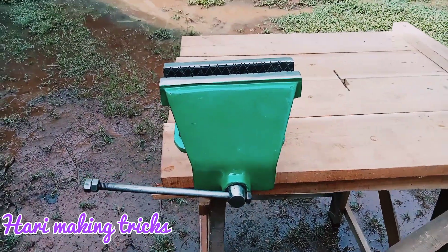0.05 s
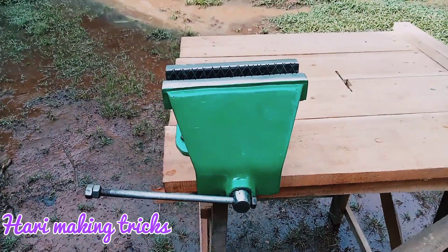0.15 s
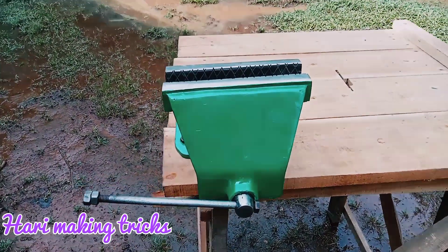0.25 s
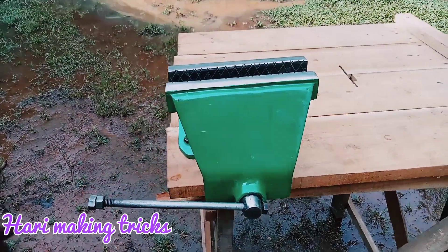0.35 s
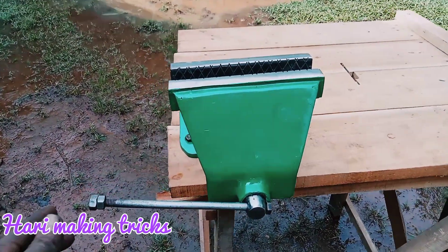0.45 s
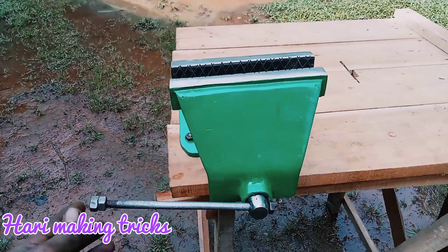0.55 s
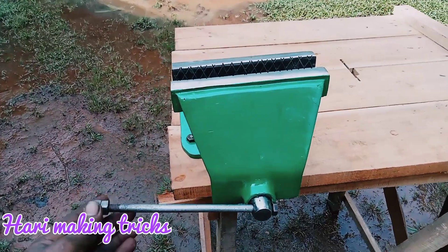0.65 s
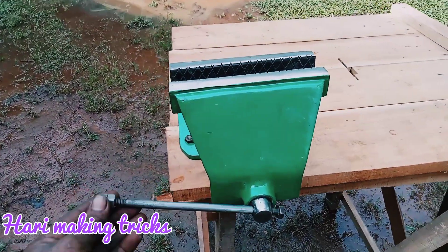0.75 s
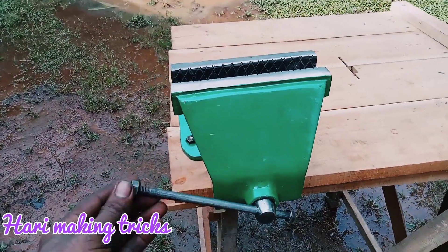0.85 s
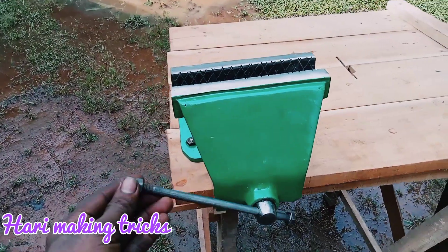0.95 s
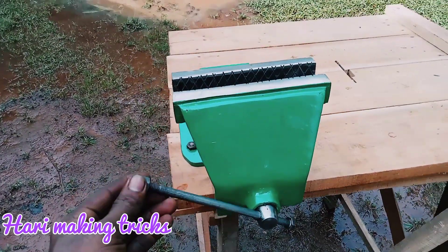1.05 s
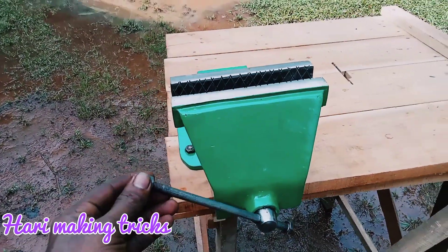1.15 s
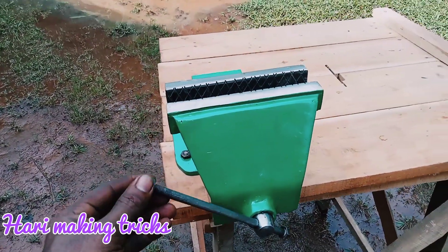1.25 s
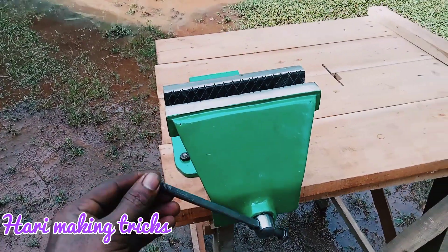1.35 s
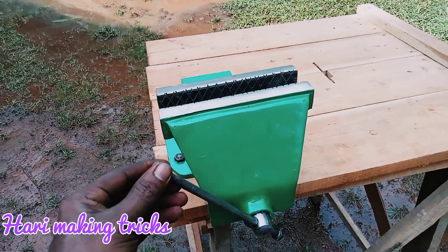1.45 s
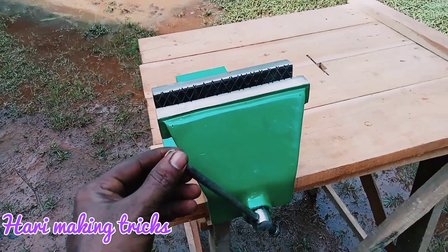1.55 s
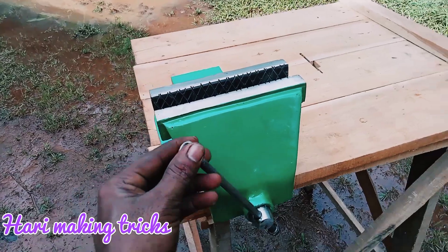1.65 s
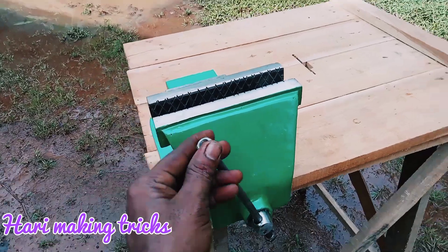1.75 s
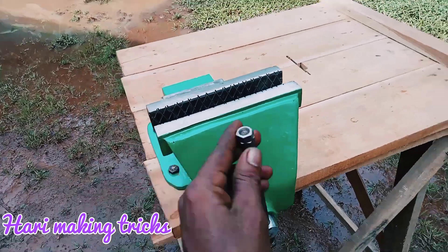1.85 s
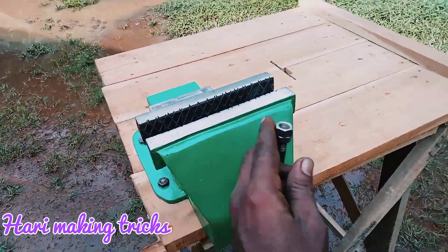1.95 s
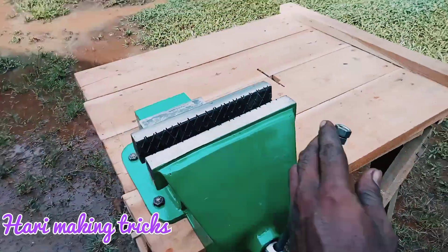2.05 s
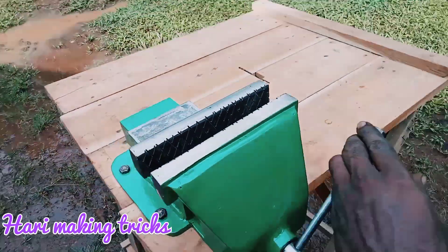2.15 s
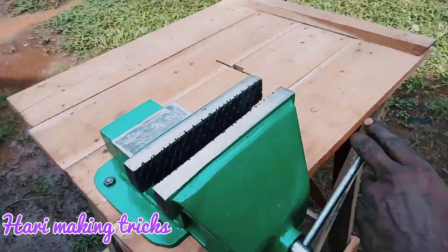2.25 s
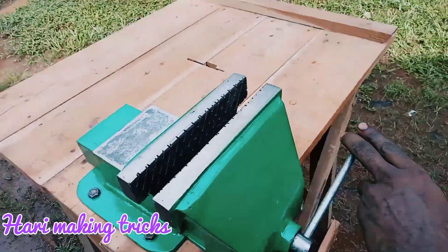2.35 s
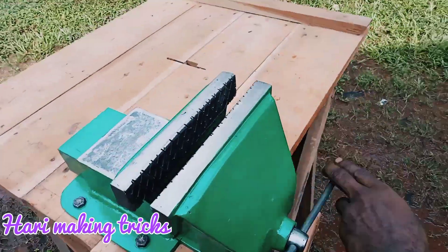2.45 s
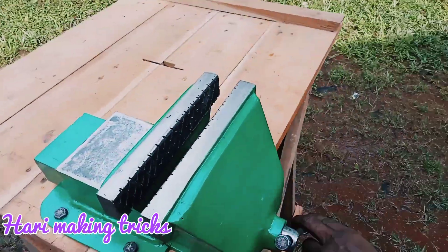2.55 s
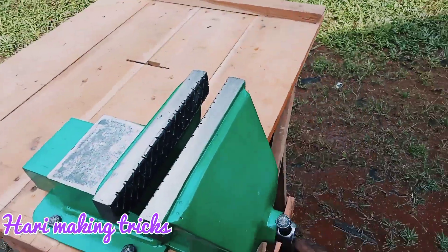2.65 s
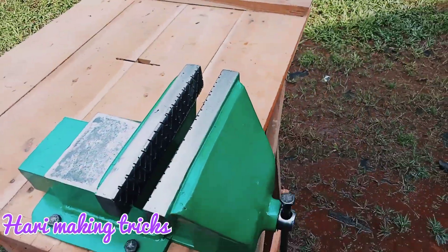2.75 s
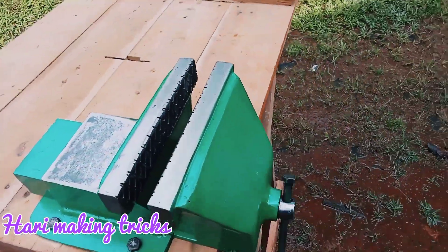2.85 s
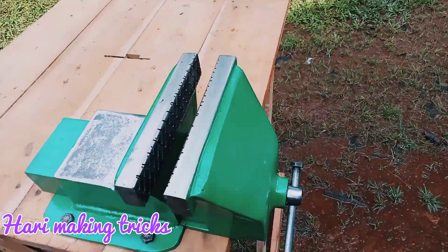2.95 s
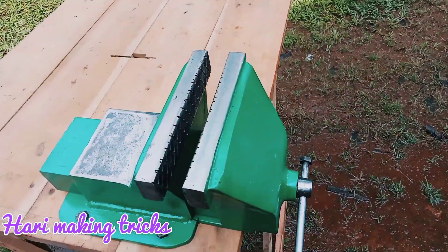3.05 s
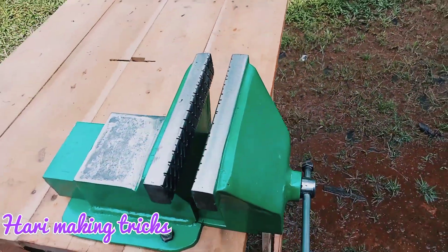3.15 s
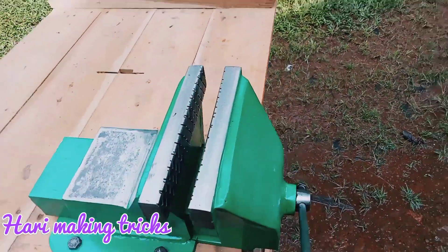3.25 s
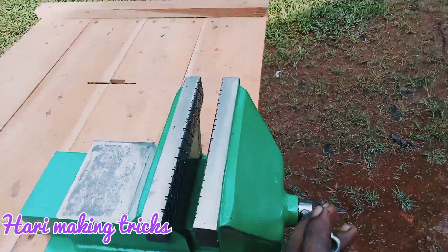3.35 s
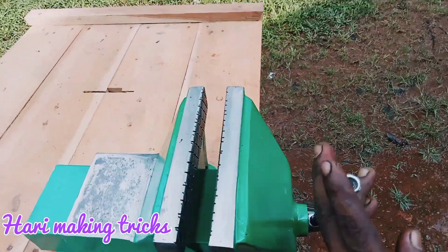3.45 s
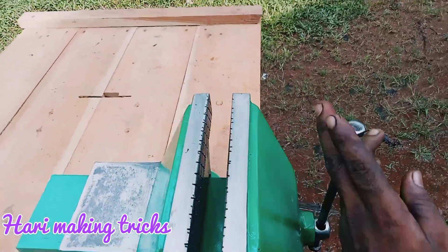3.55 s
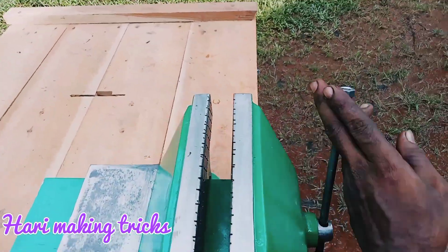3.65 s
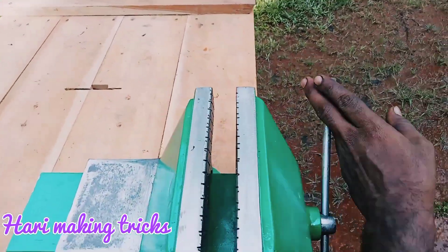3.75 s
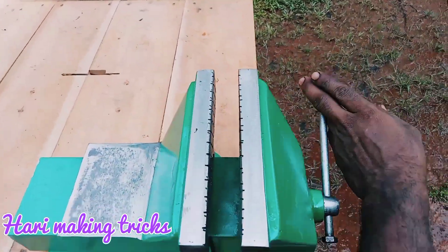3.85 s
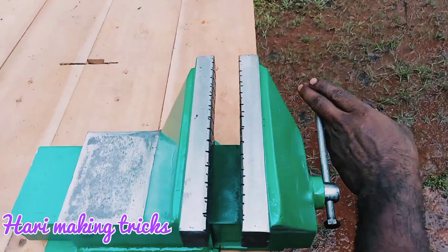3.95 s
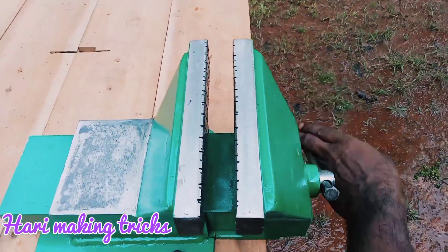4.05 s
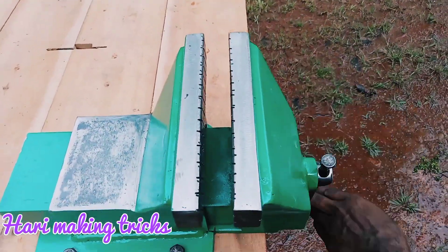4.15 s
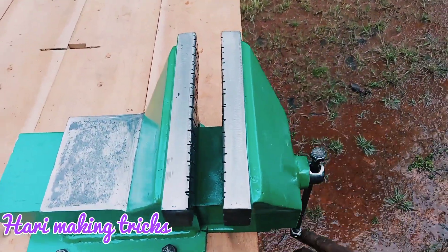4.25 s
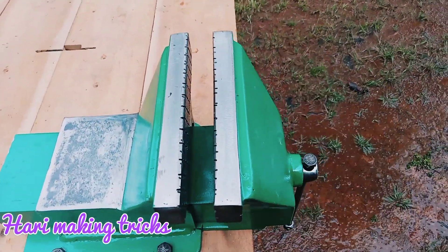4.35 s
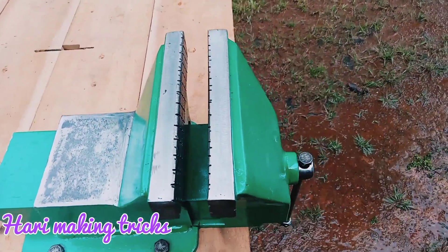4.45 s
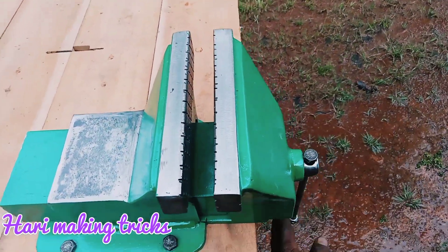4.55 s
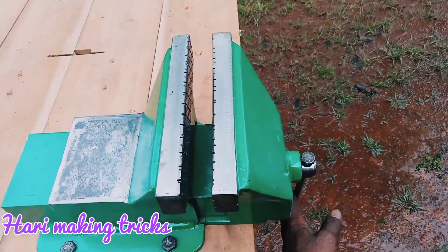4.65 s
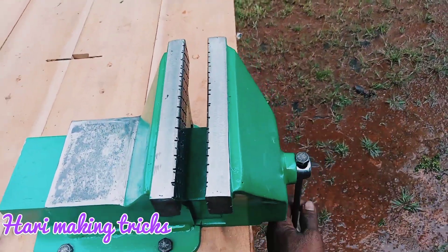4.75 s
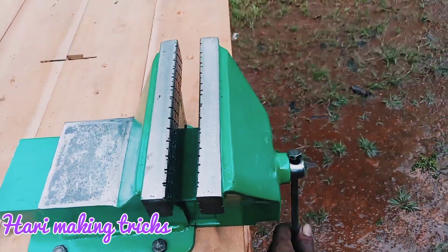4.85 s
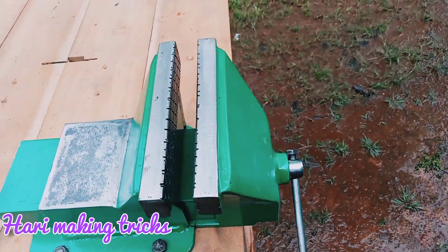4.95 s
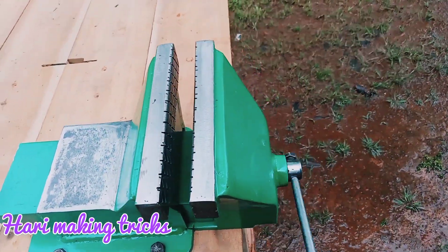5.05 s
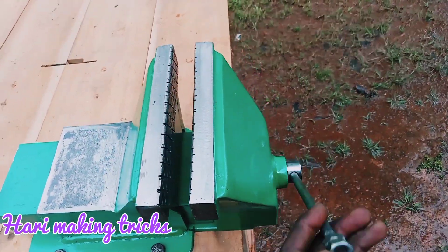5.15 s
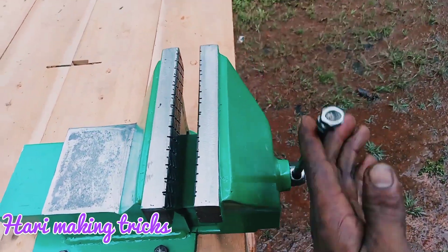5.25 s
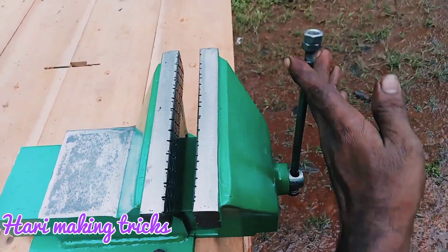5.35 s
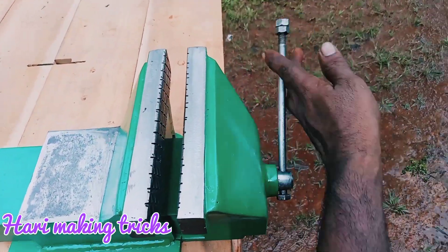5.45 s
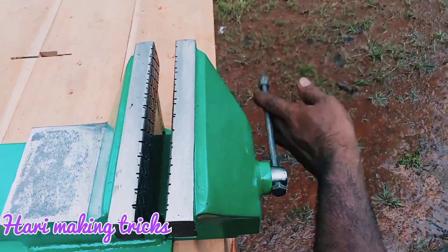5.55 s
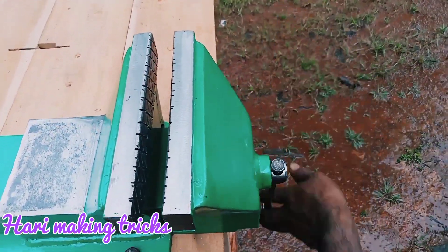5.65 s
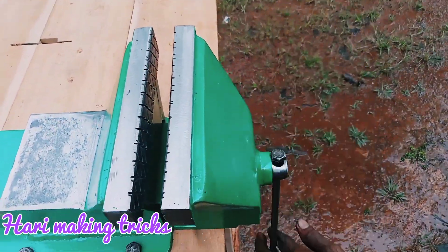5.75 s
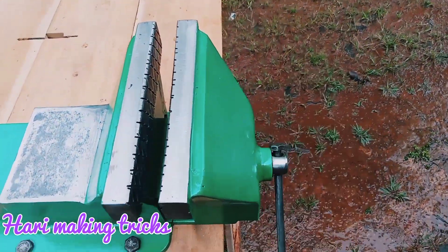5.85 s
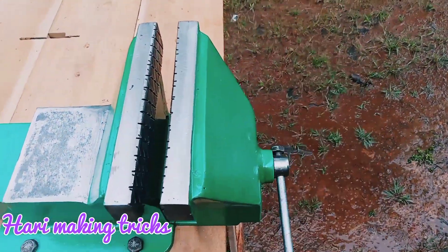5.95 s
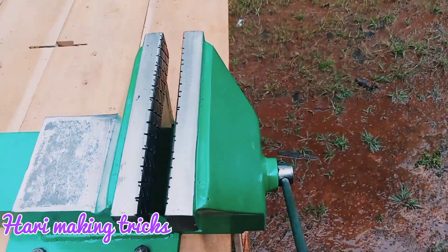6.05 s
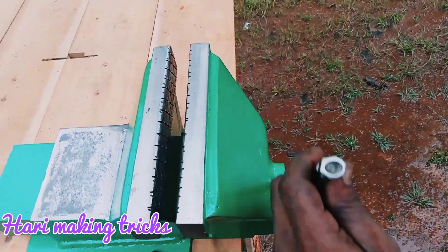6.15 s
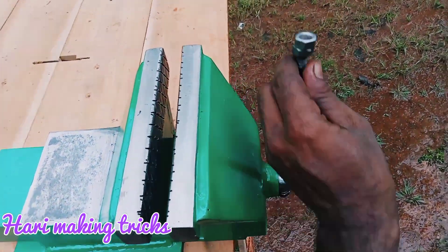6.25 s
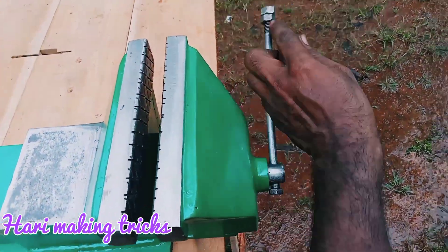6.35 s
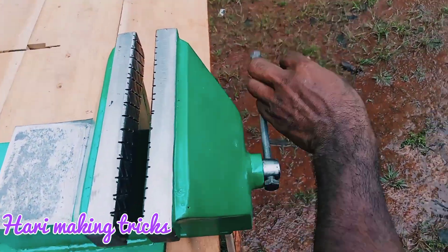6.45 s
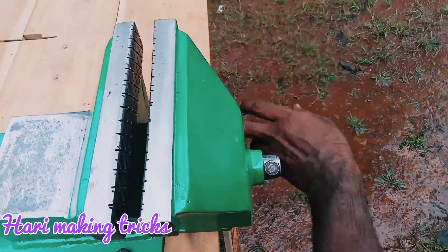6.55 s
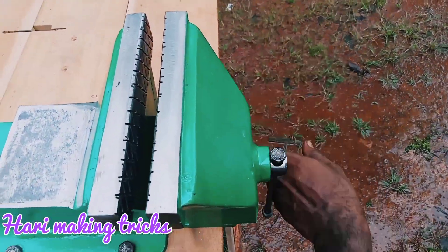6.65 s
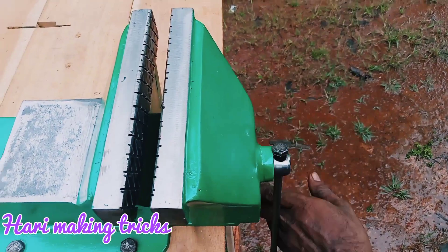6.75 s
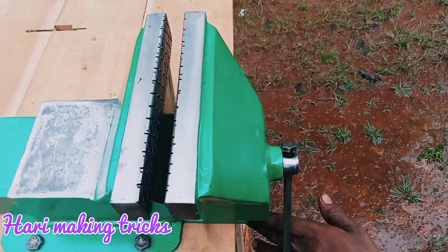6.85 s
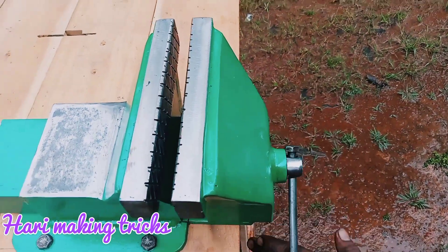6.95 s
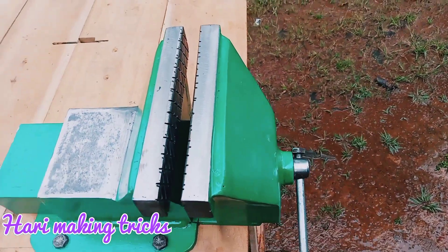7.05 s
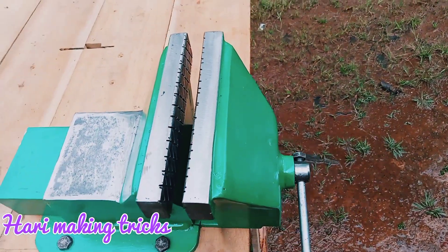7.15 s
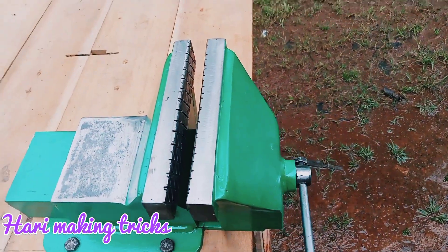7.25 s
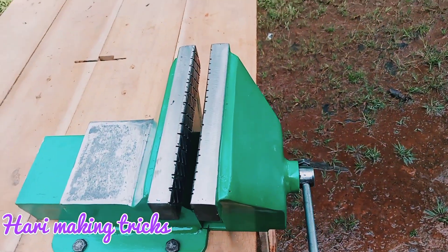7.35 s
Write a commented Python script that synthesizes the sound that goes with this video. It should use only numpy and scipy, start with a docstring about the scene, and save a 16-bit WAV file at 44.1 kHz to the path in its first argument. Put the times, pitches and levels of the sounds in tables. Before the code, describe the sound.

A steel bench vise is cranked by hand outdoors. Its loose handle bar gives light, scattered ticks and knocks at first, then the dry screw begins to rasp in uneven spurts. Just past the middle the bar drops with one sharp metallic clack, followed by busier knocks, short scrapes and soft thuds through the wooden table. Faint bird chirps, insects and a soft hiss sit behind the nearby vise.

```python
"""The sliding bar of a steel bench vise, spun by hand, ticks in its hole and once clacks onto its end nut.
The dry screw grinds by stick-slip friction and knocks in its slack. Each contact is a brief chatter
of impacts that excites the damped modes of bar, jaws and the wooden table the vise is bolted to.
Behind it, outdoors, birds chirp in gliding tones and insects trill and drone over a soft hiss."""
import sys
import numpy as np
from scipy import signal
from scipy.fft import rfft, irfft
from scipy.io import wavfile
from scipy.ndimage import uniform_filter1d

SR = 44100
rng = np.random.default_rng(int(sys.argv[2]) if len(sys.argv) > 2 else 0)


def int16_out(signal):
    """Quantize to a 16-bit WAV file."""
    q = np.round(np.clip(np.atleast_2d(signal).T, -1, 1) * 32767)
    wavfile.write(sys.argv[1], SR, q.astype(np.int16))


N = 325899
TIME = np.arange(N) / SR
CONTACT_TIME = np.arange(int(.35 * SR)) / SR  # spans one contact and its decay

# normal modes of table, jaws and bar: (frequency [Hz], relative level [dB])
TABLE_MODES = [(139, -6.5), (305, 4.5), (369, -3.5)]
JAW_MODES = [(824, 4.2), (874, 9.5), (965, 3.5), (1060, 8.3), (1222, 0.89), (1338, 3.9)]
BAR_MODES = [(1600, -2), (1830, -1), (1915, 0), (2362, 5.5), (2630, 0.5), (3683, -4)]
# envelope of the dense, short-lived resonances between them: (frequency [Hz], spectral level [dB])
STEEL_SPECTRUM = [(110, -12), (330, 0.5), (640, -11), (900, -8), (1700, -5.5), (2400, -2), (3000, -12),
                  (3700, -7.5), (4700, -18), (7200, -14.5), (10500, -58)]
# knocks and scuffs of bar and screw: (time [s], chatter time [s], level [dB], hardness [dB])
KNOCKS = [(0.1194, 0.00048, -45.5, -4), (0.595, 0.036, -44.5, 2), (0.708, 0.016, -52.5, 11.5),
          (0.878, 0.038, -41.5, 9.5), (0.956, 0.004, -39, 1), (2.308, 0.026, -43.5, 11.5),
          (3.302, 0.0042, -35.5, 2.5), (2.906, 0.018, -41, -5), (3.908, 0.0042, -33, -5),
          (4.209, 0.0095, -37, 3.5), (4.3696, 0.0051, -31.5, 14), (4.443, 0.0086, -32, 10.5),
          (4.4703, 0.0045, -15, 2.5), (4.859, 0.0045, -31.5, 4.5), (4.877, 0.0019, -20.5, 6.5),
          (5.082, 0.0026, -28.5, -1), (5.135, 0.035, -33, -7), (5.582, 0.0053, -35.5, -9.5),
          (5.705, 0.0074, -32.5, -11.5), (5.742, 0.0075, -32, 4), (5.937, 0.009, -31.5, -1),
          (6.019, 0.0082, -25, -1.5), (6.176, 0.0032, -27, 2), (6.2532, 0.0049, -25.5, -6.5),
          (6.455, 0.015, -28.5, -2.5), (6.484, 0.0054, -34.5, 0), (7.093, 0.0082, -36.5, -2.5)]
def knocks(table_share_db=.5, bar_share_db=-4, table_lag_s=.002):
    """Impact excitation: hard contacts favour the bar's modes, soft ones the heavy table's."""
    out = np.zeros(N)
    for start, length, db, hard_db in KNOCKS:
        force = chatter(length)
        dense = colour(diffuse(force, t60=.12, tail_db=17), STEEL_SPECTRUM)
        table = ring(force, TABLE_MODES, t60=.16) + amp(-7) * unit(band(dense, 130, 600))
        jaws = blend(ring(force, JAW_MODES, t60=.1), band(dense, 540, 1500), dense_db=-3.5)
        bar = blend(ring(force, BAR_MODES, t60=.095), band(dense, 1500, 9000), dense_db=-3 - hard_db / 3)
        steel = burst(jaws, db) + burst(bar, db + bar_share_db + hard_db)
        add(out, start, band(steel, 400, 3700))  # heavy parts meet too softly for much treble
        add(out, start + table_lag_s, burst(band(table, 67, 600), db + table_share_db - hard_db))
    return out


# high modes of bar and end nut: (frequency [Hz], relative level [dB])
HIGH_MODES = [(3683, 9.5), (3851, 7), (4240, -6), (5652, 7), (6438, -9), (6973, 4), (7603, -3), (8100, -4)]
# bright edge of a steel contact: (frequency [Hz], spectral level [dB])
EDGE_SPECTRUM = [(4500, -21), (6000, -2.5), (7100, 10), (9000, -8.5), (11500, -23), (14500, 4)]
# hard strikes of the bar: (time [s], chatter time [s], level [dB], tilt [dB/octave], edge cut-off [Hz])
STRIKES = [(4.3675, 0.0036, -36, -1, 7500), (4.4697, 0.0085, -16.5, -5, 13700),
           (4.877, 0.0058, -34, -13, 4000)]
def strikes():
    """Contact damping: the high modes are choked while the steel touches, leaving a faint free ring."""
    out = np.zeros(N)
    for start, length, db, tilt_db, top_hz in STRIKES:
        force = chatter(length)
        modes = tilted(HIGH_MODES, tilt_db)
        free = ring(force, [(hz, mode_db / 2) for hz, mode_db in modes], t60=.13)
        choked = ring(force, modes, t60=.045)
        edge = band(colour(force, tilted(EDGE_SPECTRUM, tilt_db)), 1000, top_hz)
        clack = blend(choked + amp(-11) * free, edge, dense_db=0)
        add(out, start, burst(band(clack, 1000, 1.15 * top_hz), db))
    return out


# ticks of the held bar: (time [s], chatter time [s], frequency [Hz], body level [dB], edge level [dB])
TICKS = [(1.444, 0.0094, 2020, -40.5, -54), (1.463, 0.0028, 2400, -44, -44.5),
         (1.474, 0.00028, 2560, -45, -45), (1.639, 0.0088, 2380, -39, -50),
         (1.665, 0.0012, 2920, -36.5, -41), (1.719, 0.0028, 2780, -59, -49.5),
         (1.8155, 0.0019, 2360, -34, -45.5), (1.8395, 0.0011, 2560, -33, -56),
         (1.9582, 0.00089, 1450, -37, -73), (2.1515, 0.001, 2560, -27.5, -39),
         (3.091, 0.0051, 2500, -33, -44), (3.318, 0.0022, 2720, -38, -47)]
def ticks():
    """Damping broadens a resonance: under the fingers the bar only snaps, with a short ping of the nut."""
    out = np.zeros(N)
    for start, length, hz, body_db, edge_db in TICKS:
        force = diffuse(chatter(length), t60=.1, tail_db=-7)
        snap = unit(resonance(force, hz, width_hz=2120))
        ping = unit(resonance(force, hz=3330, width_hz=600))
        body = band(snap + amp(-10.5) * ping, .55 * hz, 1.5 * hz)
        edge = band(colour(force, EDGE_SPECTRUM), 1000, 11000)
        add(out, start, burst(body, body_db) + burst(edge, edge_db))
    return out


def screw(slips_per_s=1000, catches_per_s=30, catch_db=9):
    """Stick-slip friction: dry threads slip in uneven spurts that rasp in the steel and shake the table."""
    drive, rasp_hz = effort()
    slips = impulses(N, slips_per_s, spread_db=3)
    catches = (rng.random(N) < catches_per_s / SR) * amp(catch_db)  # a burr catches harder
    force = (slips + catches) * amp(2.6 * drift(55))
    grit = diffuse(force, t60=.035, tail_db=5)
    dense = colour(grit, STEEL_SPECTRUM)
    thread = resonance(grit, rasp_hz * np.exp(.16 * drift(30)), width_hz=1440)
    modes = ring(force, JAW_MODES + BAR_MODES, t60=.04)
    rasp = unit(band(dense, 450, 8000)) + band(amp(1.5) * unit(thread) + amp(-8) * modes, 400, 3400)
    rumble = band(ring(force, TABLE_MODES, t60=.096) + amp(-5.5) * unit(dense), 54, 730)
    sway = ring(rumble, TABLE_MODES[:1], t60=.13)
    grind = steady(rasp) + amp(-2.5) * steady(rumble)
    return grind * drive + amp(-25.5) * steady(sway) * drive ** .47  # sway grows slower than effort


# pushes of the hand on the screw: (time [s], duration [s], level [dB], rasp frequency [Hz])
PUSHES = [(2.538, 0.067, -46.5, 1000), (2.835, 0.041, -46.5, 1670), (3.07, 0.071, -42.5, 980),
          (3.317, 0.056, -41, 1500), (3.421, 0.031, -39.5, 1990), (3.486, 0.48, -47, 720),
          (3.875, 0.096, -40, 1720), (4.045, 0.2, -39.5, 1220), (4.905, 0.25, -41.5, 1350),
          (5.065, 0.13, -37, 706), (5.23, 0.28, -46.5, 1820), (5.49, 0.14, -41, 1010),
          (5.619, 0.17, -42.5, 2380), (5.971, 0.085, -37, 2190), (6.21, 0.31, -42.5, 1090),
          (6.443, 0.19, -38.5, 1360)]
def effort(attack_s=.03, release_s=.07):
    """Driving envelope: pushes rise, hold and decay; the strongest sets the rasp's amplitude and pitch."""
    envelopes = []
    for start, length, db, _ in PUSHES:
        rise = np.clip((TIME - start) / attack_s, 0, 1)
        decay = np.exp(-np.maximum(TIME - start - length, 0) / release_s)
        envelopes.append(amp(db) * rise * decay)
    rasp_hz = np.array([hz for *_, hz in PUSHES])
    return np.max(envelopes, axis=0), rasp_hz[np.argmax(envelopes, axis=0)]


# scrapes and groans of dry steel: (time [s], chatter time [s], starting frequency [Hz], level [dB])
SCRAPES = [(.872, 0.012, 2580, -37), (.868, 0.043, 2980, -36.5), (3.148, 0.051, 887, -39.5),
           (5.089, 0.0096, 440, -23.5), (5.632, 0.072, 880, -31), (6.026, 0.0093, 1050, -31),
           (6.06, 0.021, 900, -28.5)]
def scrapes(sag_octaves_per_s=.37, wobble=.0069):
    """Friction-driven resonance: slips feed one mode, which wavers and sags as the contact slides."""
    out = np.zeros(N)
    for start, length, hz, db in SCRAPES:
        sag = 2 ** (-sag_octaves_per_s * CONTACT_TIME)
        waver = 1 + wobble * drift(80)[:len(CONTACT_TIME)]
        add(out, start, burst(resonance(chatter(length), hz * sag * waver, width_hz=186), db))
    return out


# light taps of the loose jaw in its guide: (time [s], level [dB])
JAW_TAPS = [(2.764, -36), (4.992, -30.5), (5.352, -38.5), (5.581, -36), (5.636, -34.5), (5.834, -36.5),
            (5.939, -28.5), (6.542, -35)]
def jaw_taps():
    """Free vibration: the softly struck jaw rings in its own modes, with a little rattle around it."""
    out = np.zeros(N)
    for start, db in JAW_TAPS:
        force = chatter(length_s=.002)
        rattle = colour(diffuse(force, t60=.046, tail_db=3), STEEL_SPECTRUM)
        tap = ring(force, JAW_MODES, t60=.1) + amp(-3) * unit(rattle)
        add(out, start, burst(band(tap, 540, 2600), db))
    return out


# soft pushes that rock the table top: (time [s], level [dB])
THUDS = [(0.972, -43), (2.112, -38), (2.913, -37.5), (3.111, -37), (3.507, -34), (4.133, -30),
         (4.479, -31.5), (5.66, -32), (7.218, -27.5)]
def thuds():
    """Low-frequency excitation: a soft push moves only the fundamental mode of the table."""
    out = np.zeros(N)
    for start, db in THUDS:
        fundamental = ring(chatter(length_s=.018), TABLE_MODES[:1], t60=.2)
        add(out, start, burst(band(fundamental, 80, 217), db))
    return out


# double chirps of a small bird: (time [s], centre frequency [Hz], level [dB])
CHIRPS = [(.575, 3430, -49), (3.11, 3430, -46), (3.785, 3410, -43.5), (4.583, 3000, -42.5),
          (4.77, 3510, -45), (5.235, 3470, -43), (6.285, 3090, -43.5), (7.305, 3467, -44.5)]
def bird(note_s=.04, spacing_s=.054, fall=.15, flutter=.015):
    """Frequency modulation: each call is two falling, fluttering notes, scattered by the trees."""
    out = np.zeros(N)
    progress = np.arange(int(note_s * SR)) / (note_s * SR)
    for call, hz, db in CHIRPS:
        for start in (call, call + spacing_s):
            pitch = hz * (1 + fall * (.5 - progress) + flutter * drift(500)[:len(progress)])
            add(out, start, amp(db) * note(pitch, progress))
    return diffuse(out, t60=.3, tail_db=-4)


def whistle(start_s=4.775, length_s=.075, from_hz=6080, to_hz=6330, db=-56):
    """Pure-tone glide: a second bird gives one thin rising note."""
    out = np.zeros(N)
    progress = np.arange(int(length_s * SR)) / (length_s * SR)
    pitch = from_hz + (to_hz - from_hz) * np.sin(np.pi * progress / 2)
    add(out, start_s, amp(db) * note(pitch, progress))
    return out


# course of a high insect trill: (time [s], centre frequency [Hz], level [dB])
TRILL = [(2.2, 15500, -85), (2.45, 15000, -63), (3.2, 14540, -58), (4.1, 14000, -82)]
# insect drone: (frequency [Hz], bandwidth [Hz], final level [dB])
DRONES = [(7160, 570, -59.5)]
def insects(pulses_per_s=20.6, sweep_hz=2000):
    """Modulated narrow-band noise: one insect trills in falling pulses while others drone."""
    times, hz, db = np.transpose(TRILL)
    cycle = TIME * pulses_per_s % 1
    pitch = np.interp(TIME, times, hz) + sweep_hz * (.5 - cycle)
    pulses = resonance(rng.standard_normal(N), pitch, width_hz=800) * np.sin(np.pi * cycle) ** 2
    trill = steady(diffuse(pulses, t60=.2, tail_db=-2))
    trill *= amp(np.interp(TIME, times, db, left=-100) + 2 * drift(25))
    drone = np.zeros(N)
    for drone_hz, width_hz, drone_db in DRONES:
        buzz = steady(resonance(rng.standard_normal(N), drone_hz, width_hz))
        drone += buzz * amp(drone_db + drift(25))
    return trill + drone * amp(contour(HISS_LEVEL) - HISS_LEVEL[-1][1])  # the drone follows the hiss


# outdoor hiss: (frequency [Hz], spectral level [dB])
HISS_SPECTRUM = [(30, -8), (130, -0.5), (320, -1.5), (620, -6), (1100, -6), (2350, -2.5), (3400, -7),
                 (4900, -31), (7200, -15), (9400, -24), (11500, -33.5), (15500, -35)]
# course of the hiss and of the thin treble sizzle: (time [s], level [dB])
HISS_LEVEL = [(0, -54.5), (1.3, -54.5), (2.3, -46.5), (7.0, -47)]
SIZZLE_LEVEL = [(1, -76), (2.8, -65)]
def air():
    """Broadband noise: a soft hiss swells, with a thin, flickering sizzle at the very top of the treble."""
    hiss = steady(colour(rng.standard_normal(N), HISS_SPECTRUM))
    hiss *= amp(contour(HISS_LEVEL) + .27 * drift(9))
    sizzle = steady(band(rng.standard_normal(N), 13900, 16000)) * amp(1.5 * drift(60))
    return hiss + sizzle * amp(contour(SIZZLE_LEVEL))


def chatter(length_s):
    """Contact force: loose steel meets steel in a swarm of tiny impacts that swells and dies."""
    age = CONTACT_TIME / max(length_s, 1 / SR)
    impacts_per_s = 2600 * (1 + .003 / length_s)  # short contacts are denser
    swell = age ** .7 * np.exp(-age ** 1.25)
    return unit(impulses(len(age), impacts_per_s, spread_db=2.5) * swell)


def impulses(samples, per_s, spread_db):
    """Poisson process: independent impulses of random sign and strength."""
    hits = (rng.random(samples) < per_s / SR) * rng.choice([-1, 1], samples)
    return hits * amp(spread_db * np.clip(rng.standard_normal(samples), -2, 2))


def ring(force, modes, t60):
    """Modal superposition: damped modes whose shares vary a little with the place of contact."""
    out = 0
    for hz, db in modes:
        pole = np.exp(2j * np.pi * hz / SR) * fade(1 / SR, t60)
        mode = signal.lfilter([1, 0, -1], [1, -2 * pole.real, abs(pole) ** 2], force)
        out = out + unit(mode) * amp(db + 2 * rng.standard_normal())
    return unit(out)


def resonance(force, hz, width_hz):
    """Heterodyning: two low-pass poles in a rotating frame give a resonance whose centre can move."""
    carrier = np.exp(2j * np.pi * np.cumsum(hz * np.ones(len(force))) / SR)
    pole = np.exp(-np.pi * width_hz / SR)
    return (carrier * signal.lfilter([1], [1, -2 * pole, pole ** 2], force / carrier)).real


def diffuse(x, t60, tail_db):
    """Diffuse response: overlapping resonances add a tail of decaying noise to the direct sound."""
    response = unit(rng.standard_normal(len(CONTACT_TIME)) * fade(CONTACT_TIME, t60)) * amp(tail_db)
    response[0] += 1
    return signal.fftconvolve(x, response)[:len(x)]


def colour(x, points, size=4096):
    """Minimum-phase filter through (frequency [Hz], level [dB]) points, falling away beyond them."""
    hz, db = np.transpose(sorted(points))
    octave = np.log2(np.maximum(np.fft.rfftfreq(size, 1 / SR), 1))
    known = np.log2(hz)
    octaves_outside = np.abs(octave - np.clip(octave, known[0], known[-1]))
    gain_db = np.interp(octave, known, db) - np.minimum(40 * octaves_outside, 70)
    cepstrum = irfft(np.log(amp(gain_db)))
    cepstrum[1:size // 2] *= 2  # folding the cepstrum makes the filter causal
    cepstrum[size // 2 + 1:] = 0
    return signal.fftconvolve(x, irfft(np.exp(rfft(cepstrum))))[:len(x)]


def tilted(points, db_per_octave, pivot_hz=5650):
    """Spectral tilt about a pivot frequency."""
    return [(hz, db + db_per_octave * np.log2(hz / pivot_hz)) for hz, db in points]


def blend(modes, dense, dense_db):
    """Superposition of clear modes and dense resonances at a set energy ratio."""
    return unit(modes) + amp(dense_db) * unit(dense)


def note(hz, progress):
    """Phase integrates frequency: a gliding tone under a half-sine envelope."""
    return np.sin(np.pi * progress) * np.sin(2 * np.pi * np.cumsum(hz) / SR)


def drift(rate_hz):
    """Smoothed random fluctuation with a spread near one."""
    hold = int(SR / rate_hz)
    steps = np.repeat(rng.standard_normal(N // hold + 1), hold)
    return uniform_filter1d(steps, hold)[:N] * np.sqrt(3 / 2)


def band(x, lo, hi):
    return signal.sosfilt(signal.butter(4, [lo, min(hi, .48 * SR)], "band", fs=SR, output="sos"), x)


def contour(points):
    return np.interp(TIME, *np.transpose(points))


def fade(t, t60):
    """Exponential decay by 60 dB in t60 seconds."""
    return np.exp(-np.log(1000) * t / t60)


def amp(db):
    return 10 ** (np.asarray(db) / 20)


def unit(x):
    """Normalise to unit energy."""
    return x / np.sqrt(np.sum(x ** 2) + 1e-18)


def steady(x):
    """Normalise to unit rms."""
    return x / np.std(x)


def burst(x, db):
    """Equal energy: scale to that of a hundredth of a second at this level."""
    return unit(x) * amp(db) * np.sqrt(SR / 100)


def add(out, start_s, x):
    i = max(int(start_s * SR), 0)
    out[i:i + len(x)] += x[:max(N - i, 0)]


def scene():
    """Linear superposition of vise and background in one channel."""
    vise = knocks() + jaw_taps() + strikes() + thuds() + ticks() + scrapes() + screw()
    return (vise + bird() + whistle() + insects() + air())[None]


def record(dry):
    """Band limiting: the sound starts dull, then the treble opens up to a high cut-off."""
    dull_hz, top_hz, opens_at_s = 6400, 15500, .915
    dull = signal.sosfilt(signal.ellip(8, .2, 70, dull_hz, fs=SR, output="sos"), dry)
    dull = signal.sosfilt(signal.butter(3, 4300, fs=SR, output="sos"), dull)
    opened = dull + (dry - dull) * np.clip((TIME - opens_at_s) / .005, 0, 1)
    return signal.sosfilt(signal.ellip(10, .2, 70, top_hz, fs=SR, output="sos"), opened)


dry = scene()
out = record(dry)
int16_out(out)
```